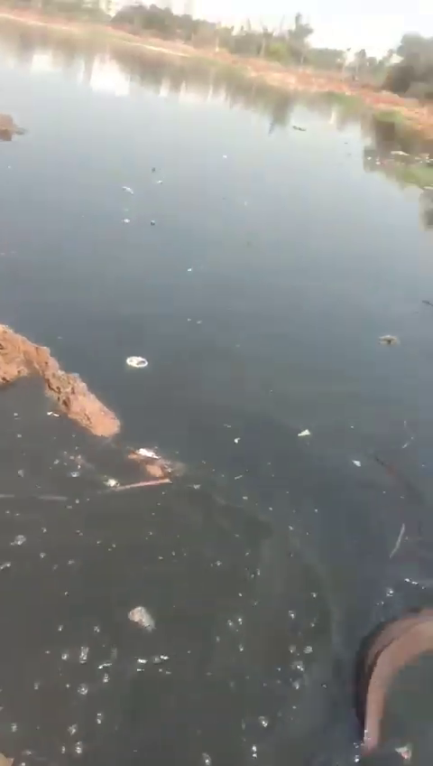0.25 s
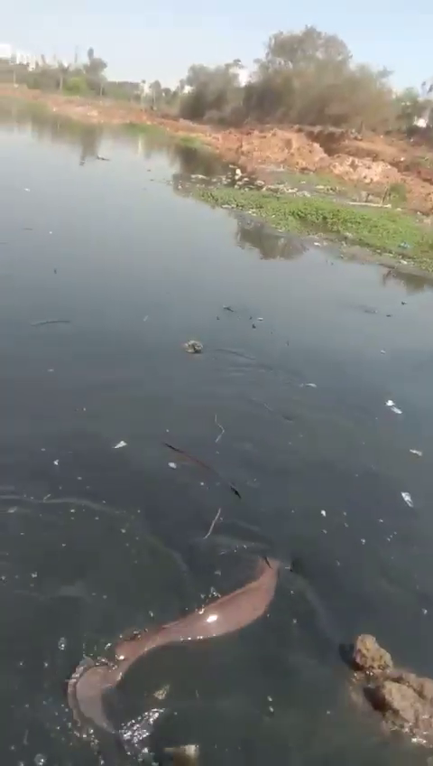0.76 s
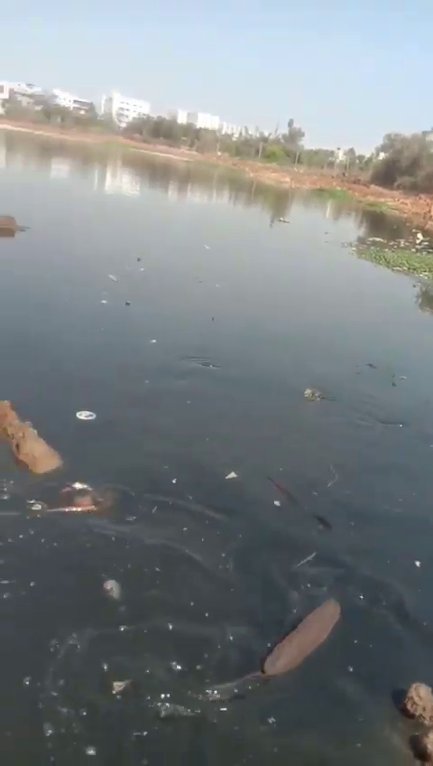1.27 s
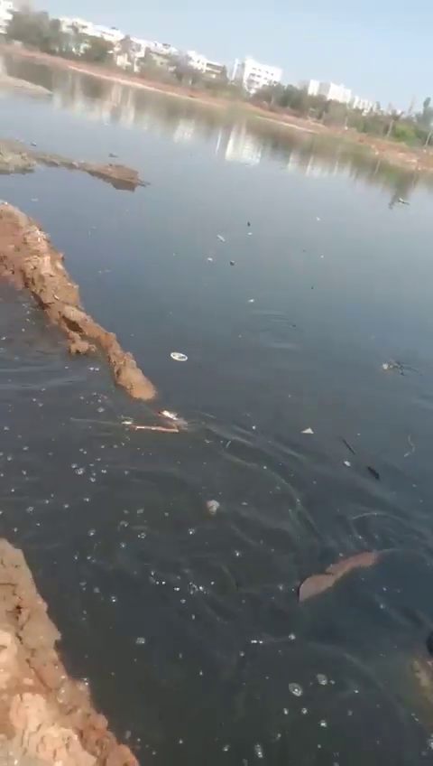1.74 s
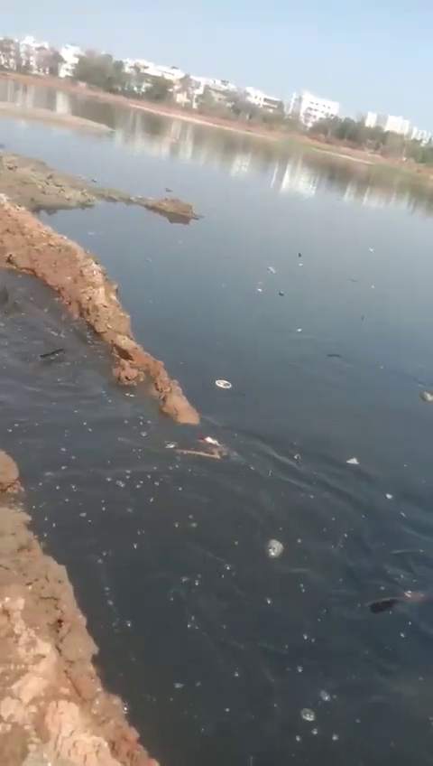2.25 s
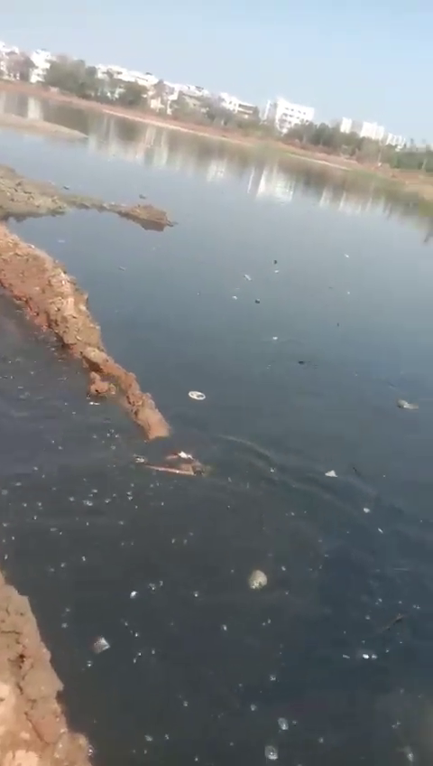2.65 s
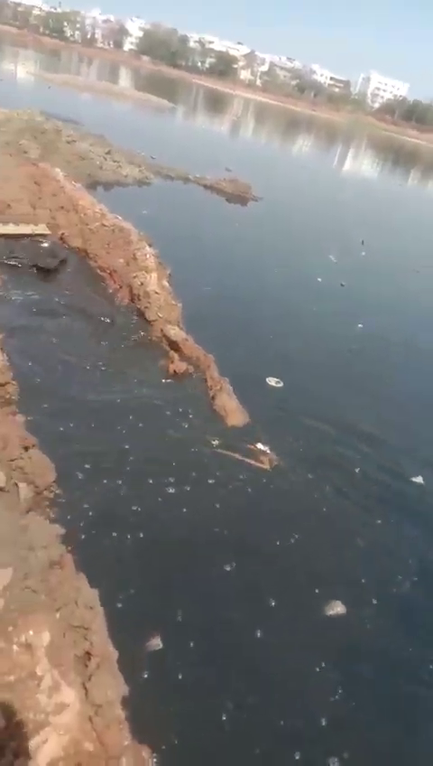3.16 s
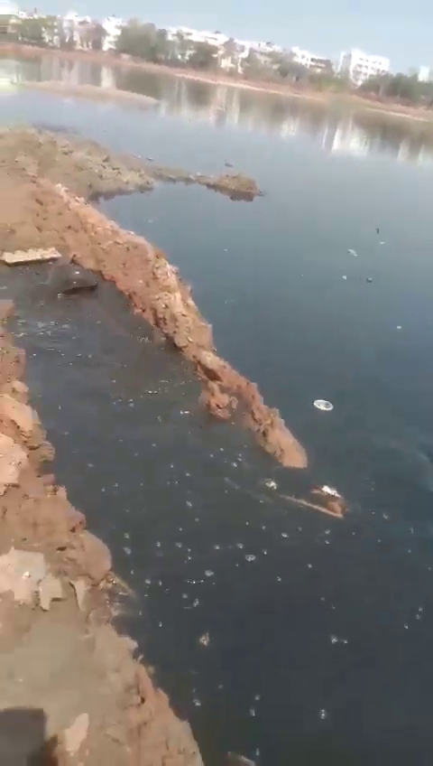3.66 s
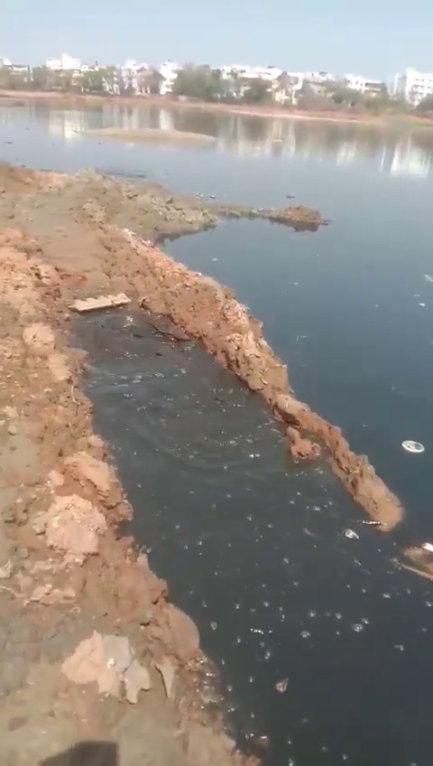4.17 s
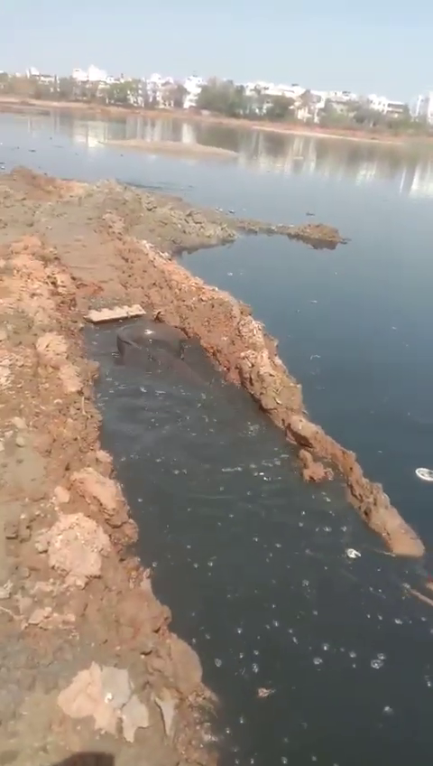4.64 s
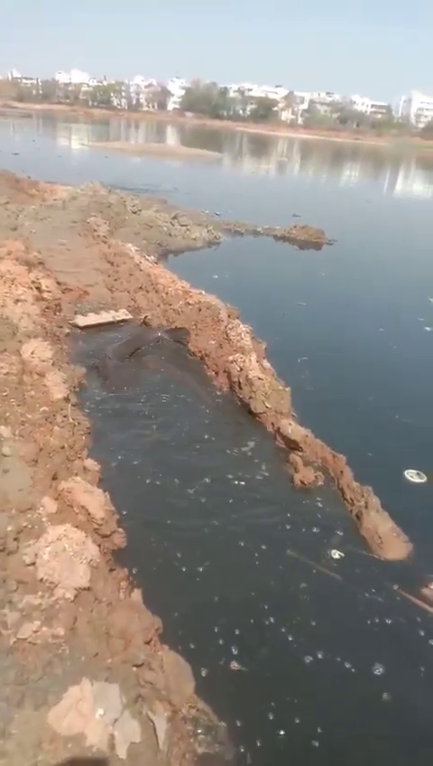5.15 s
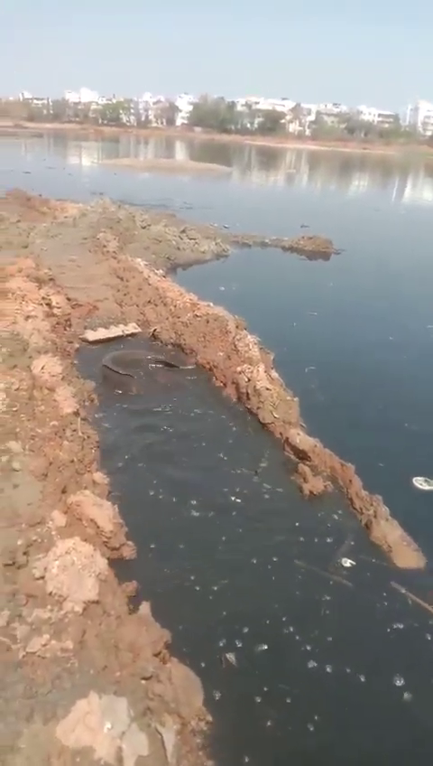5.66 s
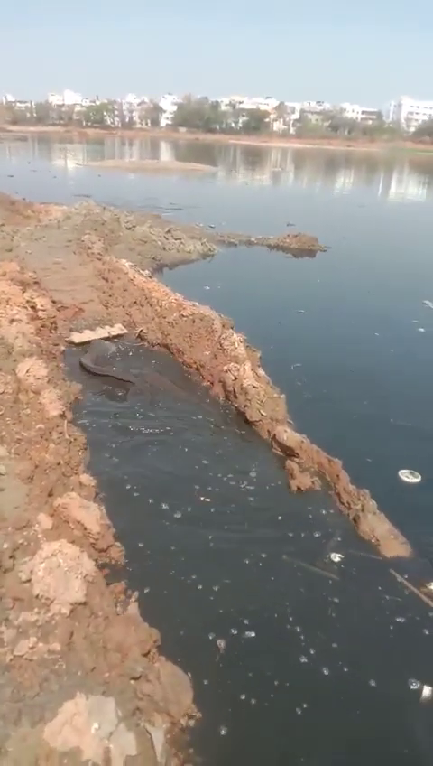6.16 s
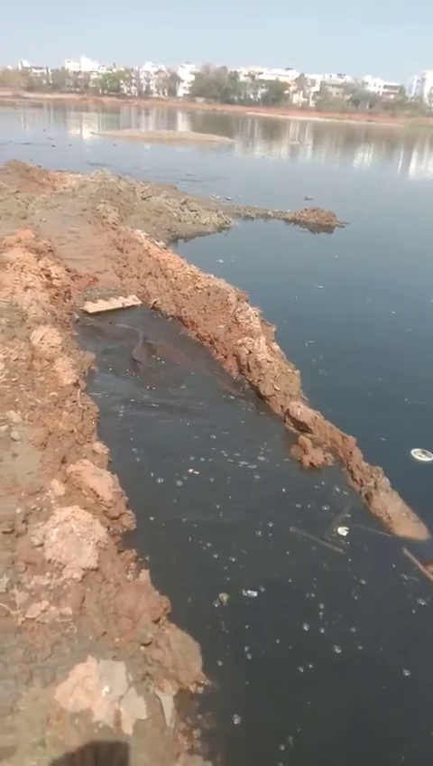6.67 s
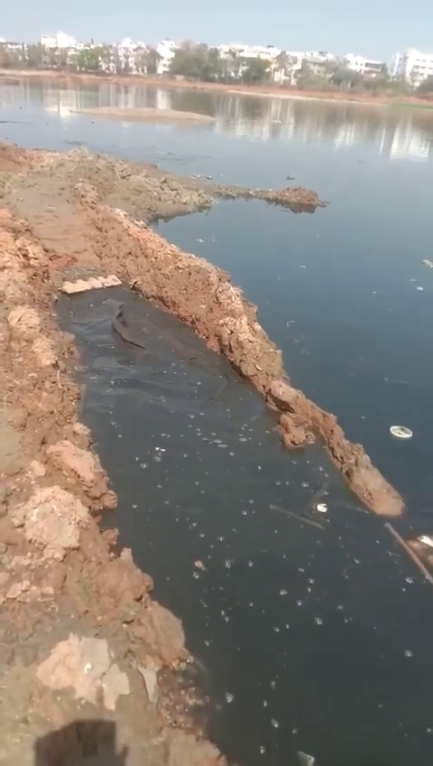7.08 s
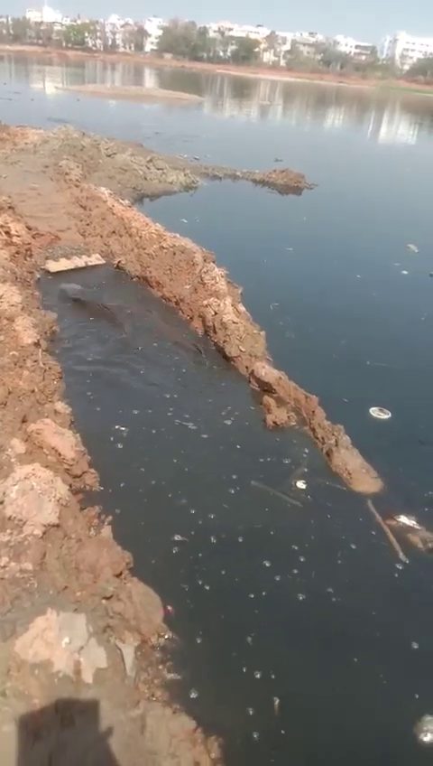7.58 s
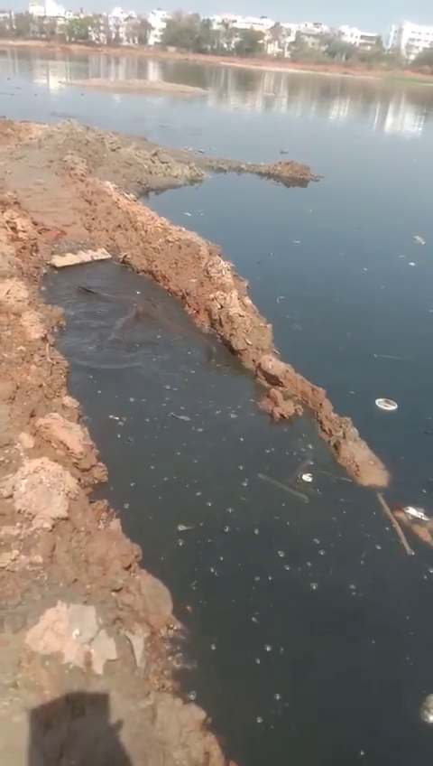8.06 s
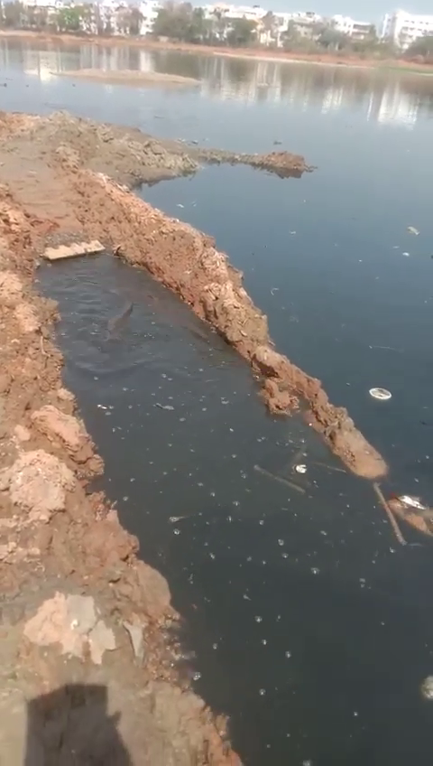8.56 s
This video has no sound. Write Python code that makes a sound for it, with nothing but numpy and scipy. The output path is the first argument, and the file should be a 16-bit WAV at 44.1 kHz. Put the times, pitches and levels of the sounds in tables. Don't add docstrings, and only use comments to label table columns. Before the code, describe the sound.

Open air at a pond's edge, practically mono through a handheld phone. From 0 s fish thrash close by: dense, bright, hissing spray with sloshing, a sharp slap at 0.06 s and crackling drops. It eases, surges again at 0.7 s with plops, and falls away after 1 s. Light bursts come at 1.4 s, then stronger slaps and swishes from 2.3 to 3.6 s, with bubbly plops and soft low housing thumps near 2.7, 3.3 and 4.3 s. From 3.9 s the water is gentler: gurgles, clustered around 4 to 4.7 s, isolated ringing drips, and small swishes at 5, 5.6 and 6.3 s. After 7 s it nearly rests. A faint low rumble and wavering far engine hum continue throughout. Tiny bird chirps appear sparsely, more from 7.3 s; a distant large bird gives one hoarse falling cry at 8.3-8.8 s.

```python
import sys
import numpy as np
from scipy import signal
from scipy.fft import rfft, irfft
from scipy.io import wavfile
from scipy.ndimage import uniform_filter1d

SR = 44100
rng = np.random.default_rng(int(sys.argv[2]) if len(sys.argv) > 2 else 0)


def bounce(signal):
    frames = np.transpose(np.atleast_2d(signal))
    limited = np.clip(frames, -1, 1)
    pcm = np.round(limited * 32767).astype(np.int16)
    wavfile.write(sys.argv[1], SR, pcm)


def convert_level_to_amplitude(level_db):
    exponent = np.asarray(level_db, float) / 20
    return 10 ** exponent


N = 388962
T = np.arange(N) / SR

# frequency in Hz, density in dB per Hz.
AIR_SPECTRUM = [(22, -32), (45, -14), (64, 1.5), (240, 0), (330, -17.5), (760, -16.5), (1000, -28.5),
                (1650, -29.5), (2350, -25), (3300, -35), (4300, -42), (5000, -29.5), (6100, -39),
                (8300, -46)]
# time in seconds, level in dB.
CALM = [(0, 0), (3, -5.5), (5, -6), (8.1, -5), (8.82, -8.5)]
# start in seconds, level in dB, hold in seconds.
FIRING_SWELLS = [(0.037, -49, 0.33), (0.577, -49, 0.2), (1.09, -46, 0.21), (1.82, -54, 0.64),
                 (3.536, -44, 0.037), (3.73, -56.5, 0.29), (4.57, -49, 0.024), (4.846, -49.5, 0.3),
                 (5.857, -47.5, 0.11), (6.44, -49, 0.044), (6.694, -49.5, 0.2), (7.114, -46.5, 0.037),
                 (7.338, -45, 0.018), (7.553, -46.5, .05), (7.737, -49, 0.18), (8.1, -47, 0.042),
                 (8.417, -50, 0.021)]
# start in seconds, level in dB, hold in seconds.
THIRD_SWELLS = [(.05, -52, 2.6), (5.35, -56.5, 0.56), (6.26, -44.5, 0.34), (7.1, -52.5, 0.59),
                (8.3, -58.5, 0.46)]
# start in seconds, level in dB, hold in seconds.
SIXTH_SWELLS = [(.3, -64.5, .3), (2.12, -66, 0.2), (3.05, -60, .3), (5.35, -70, 0.11), (7.78, -62.5, 0.13)]
# time in seconds, level in dB.
MACHINE = [(0, -46), (2.3, -48), (2.8, -65.5), (6.2, -65), (6.45, -59), (8, -67), (8.5, -76)]
# start in seconds, length in seconds, first Hz, last Hz, peak in dB.
CHIRPS = [(1.686, 0.065, 2940, 3120, -53), (1.8, 0.097, 2970, 3130, -60.5), (4.764, 0.043, 3910, 4000, -61),
          (7.3, 0.11, 1860, 1750, -59), (7.386, 0.068, 3940, 2800, -59), (7.434, 0.033, 2830, 3140, -52),
          (8.026, 0.022, 3660, 3560, -53.5), (8.248, 0.057, 2870, 2820, -60),
          (8.373, 0.045, 5000, 4990, -52.5), (8.418, 0.022, 6400, 5030, -58),
          (6.846, .045, 3880, 4050, -59), (7.303, 0.064, 4480, 4400, -69), (7.704, 0.12, 2940, 2950, -65),
          (7.859, .09, 2370, 2480, -61), (8.772, .03, 3650, 3530, -68)]
# start in seconds, length in seconds, peak in dB.
TWEETS = [(5.244, 0.25, -61.5), (7.513, 0.042, -59), (7.65, 0.052, -49.5), (7.797, 0.034, -52),
          (7.825, 0.073, -57), (7.932, 0.049, -52.5)]
# time in seconds, pitch in Hz, level in dB.
CRY = [
    (8.26, 680, -92),
    (8.285, 714, -57.5),
    (8.345, 816, -53.5),
    (8.41, 739, -54.5),
    (8.5, 673, -55),
    (8.6, 622, -56.5),
    (8.72, 584, -63),
    (8.79, 537, -77),
]
# level in dB of multiples 1, 1.5 .. 4.
CRY_SHUT_DB = [-16, -39, 7, -43, -20, -53, -34]
# level in dB of multiples 1, 1.5 .. 4.
CRY_OPEN_DB = [-31, -20, -4, -7.5, -5, -20, -13.5]
# start in seconds, length in seconds,
# pitch in Hz, peak in dB.
THUMPS = [(2.714, 0.014, 128, -34), (2.822, 0.04, 112, -39), (3.304, 0.04, 84, -28), (3.532, 0.12, 80, -48),
          (4.271, 0.15, 98, -42), (4.33, 0.058, 126, -45.5), (4.383, 0.062, 87, -36),
          (3.348, 0.04, 65.5, -38.5), (5.006, 0.11, 73, -50), (0.693, 0.003, 450, -26.5),
          (3.01, 0.0023, 620, -29), (7.572, 0.0059, 840, -40), (7.573, 0.0061, 480, -33)]
# start in seconds, level in dB, hold in seconds.
WHIFFS = [(0, -66, 0.18), (.68, -60, 0.27), (1.05, -77, 0.14), (2.7, -79, 0.037), (3.02, -82, 0.05),
          (3.248, -75, 0.14), (3.998, -74, 0.14), (5.0, -82, .05), (6.35, -85, .08)]
# time in
# seconds, peak in dB.
SNAPS = [(4.182, -55), (4.263, -47), (4.972, -49), (5.012, -47), (5.565, -58), (5.6133, -44), (6.274, -50),
         (6.3883, -38), (6.434, -49), (6.747, -59), (7.2242, -54), (7.48, -56), (7.633, -56),
         (0.0303, -35), (0.1156, -33), (0.16, -36), (0.2119, -40), (0.2468, -40), (0.2742, -28.5),
               (0.478, -43), (0.5347, -60), (0.632, -53), (0.6709, -49), (0.8106, -55), (0.8609, -50.5),
               (0.9635, -48), (1.0625, -47), (1.237, -50), (1.6416, -56), (1.9165, -63), (2.37, -47),
               (2.4194, -41), (2.467, -41), (2.648, -50), (2.9684, -48), (3.1717, -46), (3.2574, -37),
               (3.274, -42), (3.3986, -47), (3.4516, -45), (3.466, -44), (4.2926, -58), (4.3415, -51),
               (5.0789, -62), (6.3689, -49), (7.896, -60)]
# frequency in Hz, density in dB per Hz.
WATER_SPECTRUM = [(250, -20), (650, -19), (1000, -9.5), (1550, -10.5), (2250, -13), (3250, -8.5),
                  (4300, -4.5), (5100, -3), (6150, 0.5), (6700, -10), (7400, -13.5), (8400, -23.5),
                  (10500, -18), (13300, -20.5)]
# time in seconds, lowest notch in Hz, strength 0 to 1.
BANK = [(0, 1115, 0.5), (.55, 962, 0.55), (.7, 1040, 0.37), (1.1, 924, 0.72), (2.2, 1005, 0.5),
        (2.35, 1040, 0.4), (2.95, 1035, 0.58), (3.3, 960, 0.03), (4.3, 970, 0.34), (8.82, 880, 0.08)]
# time in seconds, notch spacing in Hz, strength 0 to 1.
SURFACE = [(0, 1690, 0.2), (3.3, 1600, 0.28), (3.8, 1740, 0.14), (5.5, 1690, 0.7), (8.82, 1710, 0.18)]
# time of full strength in seconds, spray in dB, hold in seconds,
# settling in dB per second, slosh minus spray in dB.
BOUTS = [(0, -36, 0.25, 12.5, -1), (0.68, -36.5, 0.23, 50, -4), (1.444, -52, 0.13, 66, 2),
         (2.298, -48.5, 0.084, 55, 4.5), (2.404, -48, 0.096, 58, -3.5), (2.654, -44.5, 0.035, 51, -3.5),
         (2.867, -46.5, 0.31, 62, 1.3), (3.25, -43.5, 0.18, 41.5, 0), (3.882, -53.5, 0.43, 30, -2),
         (4.516, -56, 0.12, 74, 0), (4.966, -55.5, 0.15, 30, -0.5), (5.56, -55, 0.053, 67, 2.5),
         (6.266, -51, 0.15, 74, -1.5), (6.98, -65.5, 0.033, 76, 7.5), (7.435, -59.5, 0.019, 91, 3)]
# time in seconds, slosh in dB, mist in dB.
ROLLS = [(0.687, -33.5, -44), (2.42, -54, -58), (3.035, -47, -51.5), (3.88, -48, -67), (4.57, -47, -74),
         (5.03, -52, -81), (5.62, -49.5, -77), (6.39, -53, -60)]
# start in seconds, change in dB, length in seconds.
LULLS = [(0.085, -7, 0.02), (0.119, -4.5, 0.029), (.222, -4.5, 0.013), (0.531, -5, 0.061),
         (0.83, -4.5, 0.022), (2.539, -4, 0.03), (2.737, -1.5, 0.058), (3.62, -1.5, 0.2), (1.33, -3, .08),
         (1.672, -4, 0.24), (2.03, -2, 0.28), (4.004, -2.5, 0.094)]
# time in seconds, peak in dB, slosh part in dB,
# mist part in dB, length in seconds.
SLAPS = [(0.0606, -11.5, -11, -26, 0.00036), (0.067, -21, -36, -14, 0.001), (1.965, -42, 1.5, -39, 0.0057),
         (2.577, -29, -4, -36, 0.00067), (2.602, -23.5, 1, -29, 0.0001),
         (2.713, -16.5, 4.5, -16.5, 0.00033), (3.008, -34, 3, 2, 0.0004), (3.022, -33, 8, -3, 0.00051),
         (3.397, -32, -8, -7, 0.00027), (3.537, -45, -5, -32, 0.00028), (3.552, -37, 6.5, -32, 0.00017),
         (0.107, -26, -30, -25, 0.00044), (3.25, -29, -31, -12, 0.0025), (3.269, -35.5, -23, -16, 0.0068),
         (3.863, -38, -4, -46, 0.0091), (3.889, -39.5, 3, -33, 0.0026), (4.98, -42.5, -15, -22, 0.013),
         (5.027, -52, 9, -27, 0.0036), (6.764, -76.5, 25, -30, 0.016)]
# time in seconds, peak in dB, slosh part in dB, centre in Hz.
TICKS = [(0.0613, -34, -13, 5670), (0.106, -20.5, -35, 5660), (0.158, -21, -14, 6100),
         (0.2682, -22.5, 4, 5730), (0.456, -19, -31, 5760), (0.6384, -22, 1, 6130),
         (0.6952, -13.5, 5.5, 5800), (0.726, -15.5, -25, 3760), (0.783, -21, -29, 5400),
         (0.818, -23, -4, 6200), (0.8604, -20, -4, 6760), (0.905, -26, -10, 3900), (0.951, -24, -12, 3920),
         (1.076, -23, -23, 4300), (1.554, -28.5, 0, 6040), (1.9663, -32, -8, 4470), (2.33, -27.5, -3, 4140),
         (2.467, -23, -11, 5070), (2.577, -35, 1, 3950), (2.599, -24, 6, 4120), (3.243, -19, -33, 5900),
         (3.3982, -33.5, 2, 6200), (3.447, -35, -21, 5560), (3.526, -19.5, -22, 3300),
         (3.551, -33, -1, 3580)]
# time in seconds, peak in dB, centre in Hz.
FLYING_DROPS = [(3.967, -29, 6200), (4.1283, -39, 6000), (4.197, -25, 6000), (4.262, -32.5, 5250),
                (4.4708, -33.5, 5700), (4.538, -36, 5240), (4.5613, -30, 5730), (4.972, -32, 5600),
                (5.1132, -30, 5550), (5.141, -36, 5940), (5.614, -32, 5940), (5.735, -39, 5400),
                (6.3219, -54, 4090), (6.3393, -29, 4050), (6.5996, -36.5, 5940), (6.84, -37.5, 5950),
                (6.867, -32, 6000), (7.224, -36, 5000), (7.442, -37, 4830), (7.4764, -34.5, 5700),
                (0.0286, -24, 6190), (0.0555, -25, 5080), (0.1885, -30, 6040), (0.2044, -33, 5990),
          (0.2438, -37, 5960), (0.3072, -24, 4380), (0.447, -23.5, 5650), (0.6709, -30, 6250),
          (0.7404, -36, 5740), (0.964, -25, 3770), (1.01, -27, 4400), (1.0576, -40, 3960),
          (1.126, -30, 4240), (1.237, -40, 6340), (1.314, -36.5, 5770), (1.4654, -29, 6000),
          (1.642, -34.5, 5900), (1.9814, -42, 5660), (2.282, -32, 5530), (2.367, -34, 5450),
          (2.419, -30, 4420), (2.5217, -32, 4540), (2.6713, -39, 6090), (2.705, -25, 3740),
          (2.7898, -31, 4180), (2.8716, -32, 5300), (2.886, -21.5, 5030), (2.929, -37, 4160),
          (3.1078, -36, 6080), (3.1234, -24.5, 4850), (3.1874, -26.5, 5030), (3.255, -17.5, 5950),
          (3.467, -32, 5530), (3.685, -35.5, 5640), (4.9995, -48, 6030), (5.0795, -41, 5710),
          (6.687, -42, 5000), (6.9282, -43, 6030), (7.1177, -45, 5900), (7.201, -54, 5930),
          (7.423, -45, 4030), (7.4544, -43, 5400), (7.634, -47, 4360)]
# time in seconds, peak in dB, pitch in Hz.
PLOPS = [(0.361, -29.5, 1550), (0.69, -19, 1275), (0.863, -21.5, 1260), (0.965, -36, 1900),
         (1.117, -33, 1390), (2.284, -31, 2160), (2.339, -32.5, 2290), (2.598, -34.5, 413),
         (2.651, -33, 2060), (2.714, -23, 1253), (3.527, -28.5, 1223), (4.049, -43.5, 428),
         (4.198, -37, 770), (4.373, -35.5, 1245), (4.472, -34, 1590), (4.563, -32, 1260),
         (5.067, -27.5, 2430), (5.62, -58, 1140), (6.794, -34.5, 1475), (7.823, -46, 2050),
         (7.845, -44, 1980),
         (3.75, -44, 2460), (3.975, -39, 1010), (4.119, -44, 2150), (4.15, -40.5, 700),
           (4.196, -40, 2300), (4.23, -49, 2420), (4.262, -50, 1220), (4.291, -42, 2390),
           (4.346, -44, 1580), (4.361, -43, 2280), (4.39, -45, 2550), (4.497, -40, 1450),
           (4.539, -36.5, 2260), (4.998, -36.5, 2320), (5.301, -49, 730), (6.337, -48, 2140),
           (6.418, -36, 1250), (6.773, -45, 2180), (6.797, -38.5, 2250), (7.595, -49.5, 2200),
           (4.41, -43, 1570), (4.51, -46, 2580), (4.615, -37, 740), (4.627, -37, 1530), (4.645, -42, 1760),
           (4.655, -44, 2140), (4.67, -47, 745), (4.691, -50, 1740), (3.87, -34, 626), (4.074, -41, 920),
           (4.22, -47, 780), (0.022, -31, 956), (.152, -33, 2180), (.17, -36, 670), (.3067, -35, 2370),
           (.424, -46, 824), (.7118, -33, 2320), (0.8126, -30.5, 2390), (.879, -41, 670),
           (2.4184, -36, 2510), (2.475, -40, 2520), (2.4988, -33.5, 2450), (3.1657, -40, 2210),
           (6.99, -45.5, 814)]
# start in seconds, length in seconds, first Hz, last Hz, peak in dB.
GULPS = [
    (2.179, .026, 1170, 1290, -38),
    (3.206, .013, 1600, 2300, -32),
    (4.572, .024, 600, 960, -39),
    (4.595, .03, 1050, 1350, -45),
]


def columns(table):
    s, *rest = np.transpose(table)
    return [np.interp(T, s, c) for c in rest]


def unit(x):
    return x / np.sqrt(np.mean(x ** 2))


def walk(rate_hz):
    k = int(SR / rate_hz)
    steps = np.repeat(rng.standard_normal(N // k + 1), k)
    return unit(uniform_filter1d(uniform_filter1d(steps, k), k)[:N])


def add(out, s, piece):
    i = int(s * SR)
    out[i:i + len(piece)] += piece[:N - i]


def humps(at, db, hold_s, rise_db_s, fall_db_s, floor_db):
    t = T[::32]
    power = convert_level_to_amplitude(floor_db) ** 2
    for s, top_db, stay_s, fall in np.broadcast(at, db, hold_s, fall_db_s):
        before = rise_db_s * np.maximum(s - t, 0)
        after = fall * np.maximum(t - s - stay_s, 0)
        power = power + convert_level_to_amplitude(top_db - before - after) ** 2
    return np.interp(T, t, 10 * np.log10(power))


def swell(length_s, hz, to_hz, skew):
    u = np.arange(int(length_s * SR)) / (length_s * SR)
    cycles = length_s * (hz * u + (to_hz - hz) * u ** 2 / 2)
    return np.sin(np.pi * u ** skew) ** 0.55 * np.sin(2 * np.pi * cycles)


def bursts(times, db, lengths_s):
    out = np.zeros(N)
    for at, gain, length_s in zip(times, convert_level_to_amplitude(db), np.maximum(lengths_s, 0.0002)):
        u = np.arange(int(7 * length_s * SR)) / (length_s * SR)
        add(out, at, gain * u ** 1.5 * np.exp(1 - u))
    return out


def slices(lo_hz, hi_hz, count):
    whole = rfft(rng.standard_normal(N))
    hz = np.arange(N // 2 + 1) * SR / N
    place = count * np.log(hz / lo_hz + 1e-9) / np.log(hi_hz / lo_hz)
    place = np.clip(place, 0.5, count - 0.5)
    return [irfft(whole * np.clip(1 - abs(place - k - 0.5), 0, 1), N) for k in range(count)]


def hiss(lo_hz, hi_hz):
    band = signal.butter(2, (lo_hz, hi_hz), "bandpass", fs=SR, output="sos")
    return unit(signal.sosfilt(band, rng.standard_normal(N)))


def colour(x, spectrum, lo_hz, hi_hz, port_db, mesh_db=20.4):
    hz = np.arange(1, 4098) * SR / 8194
    at_hz, level_db = np.transpose(spectrum)
    db = np.interp(np.log(hz), np.log(at_hz), level_db)
    for peak_hz, width_hz, lift_db in ((1258, 95, port_db), (15100, 1000, mesh_db)):
        db = db + lift_db / (1 + (2 * (hz - peak_hz) / width_hz) ** 2)
    gain = convert_level_to_amplitude(db) / np.sqrt((1 + (lo_hz / hz) ** 12) * (1 + (hz / hi_hz) ** 12))
    cep = irfft(np.log(gain + 1e-7))
    cep[1:4096] *= 2
    cep[4097:] = 0
    h = irfft(np.exp(rfft(cep)))[:4096]
    return signal.oaconvolve(x, h / np.sqrt(np.sum(h ** 2)))[:N]


def comb(x, notch_hz, strength):
    dull = signal.sosfiltfilt(signal.butter(2, 6500, fs=SR, output="sos"), x)
    echo = np.interp(T - 0.5 / notch_hz, T, dull)
    return (x + strength * echo) / np.sqrt(1 + strength ** 2)


def patchy(x):
    patch_db, patch_hz, patch_s, top_hz = 2.9, 200, 0.09, 7000
    hz, _, z = signal.stft(x, SR, nperseg=512)
    wide, long = int(patch_hz * 512 / SR), int(patch_s * SR / 256)
    field = rng.standard_normal(z.shape)
    for _ in range(2):
        field = uniform_filter1d(uniform_filter1d(field, wide, axis=0), long, axis=1)
    gain = convert_level_to_amplitude(patch_db * unit(field) * (hz < top_hz)[:, None])
    return signal.istft(z * unit(gain), nperseg=512)[1][:N]


def air():
    swelling_db = walk(2.8)
    low = sum(noise * convert_level_to_amplitude(2.0 * walk(9)) for noise in slices(40, 320, count=4))
    high = sum(noise * convert_level_to_amplitude(swelling_db + 1.6 * walk(3.9)) for noise in slices(260, 8100, count=6))
    rumble = colour(low, AIR_SPECTRUM, 4.9, 357, port_db=-5)
    lapping = colour(patchy(high), AIR_SPECTRUM, 317, 13000, port_db=26.0, mesh_db=21.0)
    lapping = comb(lapping, notch_hz=1080, strength=0.035)
    return convert_level_to_amplitude(-47.5) * (rumble + convert_level_to_amplitude(-11.0) * lapping) * convert_level_to_amplitude(columns(CALM)[0])


def wavering(hz, db, rate_hz, depth):
    turn = 2 * np.pi * hz * T
    tone = (1 + depth * walk(rate_hz)) * np.sin(turn) + depth * walk(rate_hz) * np.cos(turn)
    return convert_level_to_amplitude(db) * tone * np.sqrt(2 / (1 + 2 * depth ** 2))


def breeze(swells, lull_db):
    return humps(*np.transpose(swells), rise_db_s=157, fall_db_s=157, floor_db=lull_db)


def pump():
    firing_hz, machine_hz = 71.13, 232.5
    phase = 2 * np.pi * firing_hz * T + 1.22 * walk(8)
    out = np.sqrt(2) * convert_level_to_amplitude(breeze(FIRING_SWELLS, -59.5)) * np.sin(phase)
    out += wavering(2 * firing_hz, -61, 9, 3.3)
    out += wavering(3 * firing_hz, breeze(THIRD_SWELLS, -86), 18, 0.66)
    out += wavering(6 * firing_hz, breeze(SIXTH_SWELLS, -76.5), 25, 1.75)
    return out + wavering(machine_hz, columns(MACHINE)[0], 16, 0.87)


def chirps():
    out, burr = np.zeros(N), walk(500)
    notes = [(*row, 0.42) for row in CHIRPS]
    notes += [(s, length_s, 4100, 4390, db, 0.45) for s, length_s, db in TWEETS]
    for at, length_s, hz, to_hz, db, rough in notes:
        note = swell(length_s, hz, to_hz, 1.0)
        flutter = burr[int(at * SR):][:len(note)]
        add(out, at, convert_level_to_amplitude(db) * note * (1 - rough + rough * flutter))
    return out


def cry():
    beak_opens_s, beak_takes_s = 8.39, 0.11
    hz, db = columns(CRY)
    beak = np.clip((T - beak_opens_s) / beak_takes_s, 0, 1)
    jitter = (0.0029 + 0.0052 * beak) * walk(70)
    turn = 2 * np.pi * np.cumsum(hz * (1 + jitter)) / SR
    beat = 2 * np.pi * np.cumsum(101 * (1 + 0.0367 * walk(18))) / SR
    flutter = 1 + (0.31 + 0.38 * beak) * np.sin(beat)
    out = np.zeros(N)
    for k, (shut_db, open_db) in enumerate(zip(CRY_SHUT_DB, CRY_OPEN_DB)):
        part_db = db + shut_db + beak * (open_db - shut_db) + 2.7 * beak * walk(45)
        out += (db > -74) * convert_level_to_amplitude(part_db) * flutter * np.sin((k / 2 + 1) * turn)
    return out


def birds():
    small, large = chirps(), cry()
    t = np.arange(SR // 4) / SR
    tail = rng.standard_normal(SR // 4) * np.exp(-t / 0.08)
    return small + large + convert_level_to_amplitude(-32) * signal.oaconvolve(large + small / 2, tail)[:N]


def thumps():
    out = np.zeros(N)
    for at, length_s, hz, db in THUMPS:
        add(out, at, convert_level_to_amplitude(db) * swell(length_s, 1.293 * hz, 0.577 * hz, 0.58))
    return out


def whiffs():
    level_db = humps(*np.transpose(WHIFFS), rise_db_s=186, fall_db_s=93, floor_db=-100)
    return hiss(14000, 15700) * convert_level_to_amplitude(level_db + 4.8 * walk(40))


def snaps():
    snap_s = 0.00064
    at, db = np.transpose(SNAPS)
    return hiss(9100, 11130) * bursts(at - snap_s, db - 7.5, snap_s + 0 * at)


def bubble(hz, t60_s, glide):
    t = np.arange(int(t60_s * SR)) / SR
    envelope = (1 - np.exp(-t * hz / 1.64)) * 1000. ** (-t / t60_s)
    return envelope * np.sin(2 * np.pi * hz * (t + glide * t ** 2 / t60_s))


def bubbles():
    out = np.zeros(N)
    for at, db, hz in PLOPS:
        add(out, at, convert_level_to_amplitude(db + 1.5) * bubble(hz, 0.022 + 8.5 / hz, 0.049))
        for late, ratio in rng.random((3, 2)):
            torn = bubble(hz * (0.744 + 0.612 * ratio), 0.015 + 6.2 / hz, 0.14)
            add(out, at + 0.025 * late, convert_level_to_amplitude(db - 9.5) * torn)
    for at, length_s, hz, to_hz, db in GULPS:
        add(out, at, convert_level_to_amplitude(db) * swell(length_s, hz, to_hz, 0.86))
    t = np.arange(SR // 5) / SR
    hollow = rng.standard_normal(SR // 5) * np.exp(-t / 0.019)
    return out + convert_level_to_amplitude(-35.5) * signal.oaconvolve(out, hollow)[:N]


def froth(db, lo_hz, hi_hz, count):
    out = np.zeros(N)
    for at, place, size, ring in rng.random((count, 4)):
        hz = lo_hz * (hi_hz / lo_hz) ** place
        i = int(at * N)
        piece = bubble(hz, 0.013 + (5.8 + 70 * ring) / hz, 0.1)
        add(out, i / SR, convert_level_to_amplitude(db[i] + 7.2 * size ** 3) * piece)
    return out


def fade(x, decay_s):
    return signal.lfilter([1], [1, -np.exp(-1 / (decay_s * SR))], x)


def spatter(rate_hz, spread_db, decay_s):
    at, size = rng.random((int(N / SR * rate_hz), 2)).T
    hits = np.zeros(N)
    hits[(at * N).astype(int)] = convert_level_to_amplitude(spread_db * np.minimum(-np.log(size), 3))
    power = fade(fade(hits, decay_s), decay_s) ** 2
    return power / power.mean()


def rolling(bed_db, roll_db, floor_db):
    rolls_db = humps(np.transpose(ROLLS)[0], roll_db, 0, 263, 221, floor_db)
    return 10 * np.log10(convert_level_to_amplitude(2 * bed_db) + convert_level_to_amplitude(2 * rolls_db))


def stirring():
    rise_db_s, slosh_floor_db, mist_floor_db = 269, -64.5, -80.5
    at, db, hold_s, fall_db_s, deep_db = np.transpose(BOUTS)
    spray_db = humps(at, db, hold_s, rise_db_s, fall_db_s, -66.5)
    slosh_db = humps(at, db + deep_db, hold_s, rise_db_s, fall_db_s, slosh_floor_db - 1)
    mist_db = -51 + 1.56 * (spray_db - BOUTS[0][1])
    _, roll_slosh_db, roll_mist_db = np.transpose(ROLLS)
    slosh_db = rolling(slosh_db, roll_slosh_db, slosh_floor_db) - spray_db
    mist_db = rolling(mist_db, roll_mist_db, mist_floor_db) - spray_db
    resting_db = 3 * np.maximum(T - 6.93, 0)
    return spray_db - resting_db, slosh_db, mist_db


def lulls():
    edge_s = 0.0067
    return sum(db * np.clip(np.minimum(T - s, s + length_s - T) / edge_s + 1, 0, 1)
               for s, db, length_s in LULLS)


def torn_water(part, lo_hz, hi_hz, bed_db, drops, drop_db, slap_db, shared):
    drop_s, slap_s, length_s = drops[0], np.transpose(SLAPS)[0], np.transpose(SLAPS)[4]
    drive, wash = np.zeros((2, N))
    drive[(slap_s * SR).astype(int)] = 8.0 * convert_level_to_amplitude(slap_db) * np.exp(-length_s / 0.00047)
    tears = bursts(slap_s, slap_db, length_s)
    for k, noise in enumerate(slices(lo_hz, hi_hz, count=2 if part == "mist" else 4)):
        patter = np.sqrt(0.25 + 0.4 * shared + 0.45 * spatter(50, 4.34, 0.0045))
        bed = patter * convert_level_to_amplitude(1.7 * walk(22))
        if part == "slosh" and k < 2:
            bed = bed * convert_level_to_amplitude(0.53 * np.minimum(bed_db + 36.5, 0))
        if part == "spray":
            octaves_off = np.log2(lo_hz * (hi_hz / lo_hz) ** (k / 4 + 1 / 8) / drops[3])
        else:
            octaves_off = 0.36 * rng.standard_normal(len(drop_s))
        ticks = bursts(drop_s, drop_db - 41.0 * abs(octaves_off), np.full(len(drop_s), 0.0011))
        drive += noise * (ticks + tears)
        wash += noise * bed * convert_level_to_amplitude(bed_db - 2.5)
    return drive, wash


def water():
    spray_db, slosh_db, mist_db = stirring()
    spray_db = spray_db + lulls()
    shared = spatter(160, 0.47, 0.00039)
    drops = np.transpose(TICKS + [(s, db - 0.5, -9.5, hz) for s, db, hz in FLYING_DROPS])
    drop_s, peak_db, drop_slosh_db, drop_hz = drops
    _, slap_peak_db, slap_slosh_db, slap_mist_db, _ = np.transpose(SLAPS)
    drop_mist_db = np.interp(drop_s, T, mist_db) - 0.5
    out = np.zeros(N)
    for part, lo_hz, hi_hz, part_db, drop_part_db, slap_part_db in [
            ("slosh", 296.3, 2950, slosh_db, drop_slosh_db, slap_slosh_db),
            ("spray", 3150, 7330, 0.012, 0, 0),
            ("mist", 7250, 12200, mist_db, drop_mist_db, slap_mist_db)]:
        bed_db = spray_db + part_db
        drive, wash = torn_water(part, lo_hz, hi_hz, bed_db, drops, peak_db + drop_part_db - 8.0,
                                 slap_peak_db + slap_part_db - 5.5, shared)
        if part != "mist":
            froth_db = bed_db + 0.5 * np.minimum(spray_db + 50, 0) - 9.5
            drive += froth(froth_db, 1.8 * lo_hz, hi_hz, count=1000)
            wash = patchy(wash)
        out += colour(drive + wash, WATER_SPECTRUM, lo_hz, hi_hz, port_db=12.5)
    for at, db, hz in zip(drop_s, peak_db, drop_hz):
        add(out, at, convert_level_to_amplitude(db - 0.5) * bubble(hz, 0.0075, 0.086))
    spacing_hz, strength = columns(SURFACE)
    return comb(comb(out, *columns(BANK)), spacing_hz / 2, -strength)


def scene():
    mono = air() + pump() + birds() + thumps() + whiffs() + snaps() + bubbles() + water()
    return np.array([mono, mono])


def low_pass(x):
    return signal.sosfilt(signal.butter(12, 16920, fs=SR, output="sos"), x)


def record(dry):
    wander = convert_level_to_amplitude(-32.0) * walk(60) + convert_level_to_amplitude(-34.0) * walk(400) + convert_level_to_amplitude(-41.0) * rng.standard_normal(N)
    side = dry[0] * wander
    top = signal.ellip(10, 0.5, 50, 15750, fs=SR, output="sos")
    mix = signal.sosfilt(top, dry + np.array([side, -side]))
    return low_pass(mix)


dry = scene()
out = record(dry)
bounce(out)
```